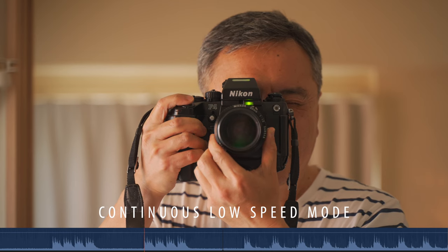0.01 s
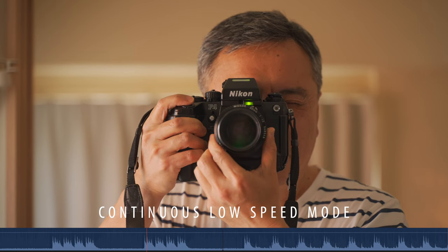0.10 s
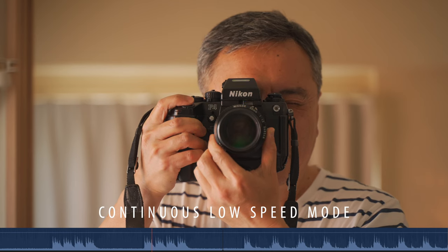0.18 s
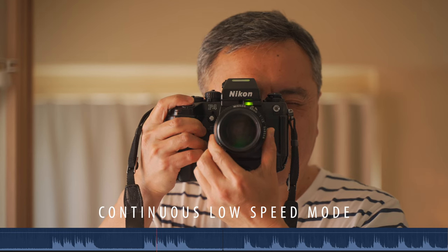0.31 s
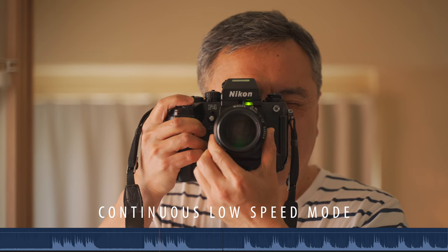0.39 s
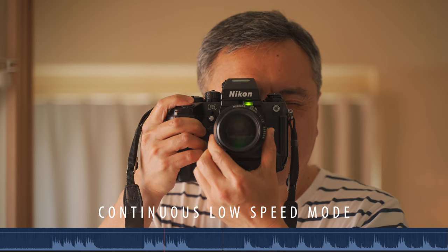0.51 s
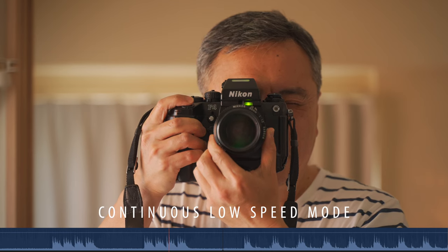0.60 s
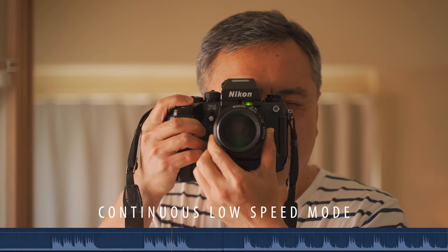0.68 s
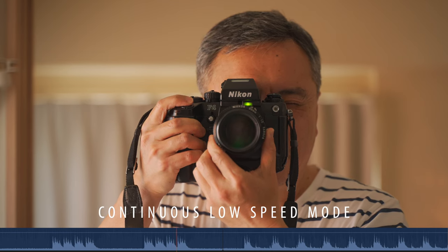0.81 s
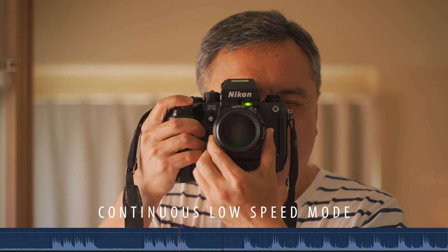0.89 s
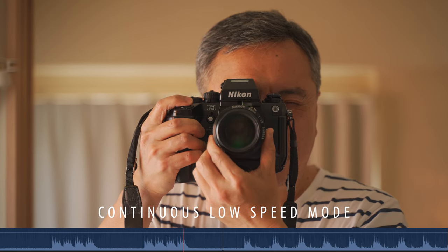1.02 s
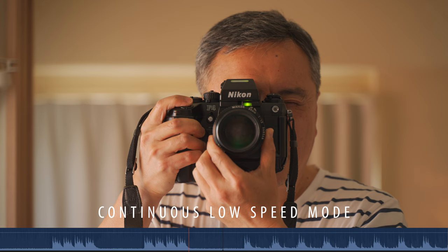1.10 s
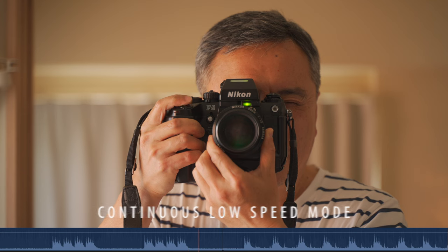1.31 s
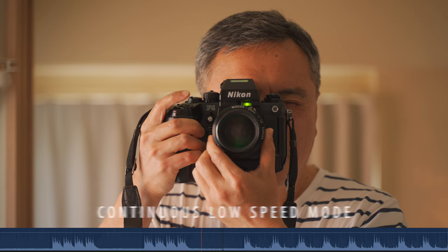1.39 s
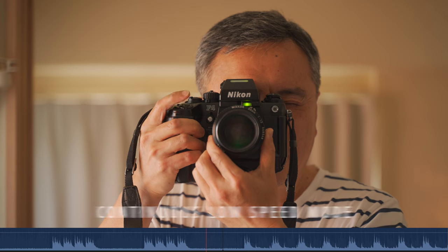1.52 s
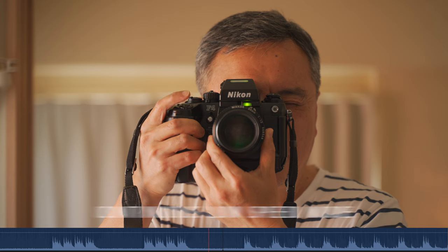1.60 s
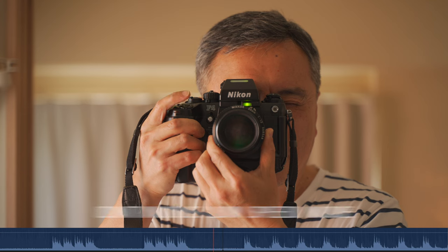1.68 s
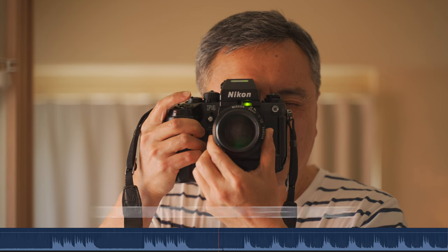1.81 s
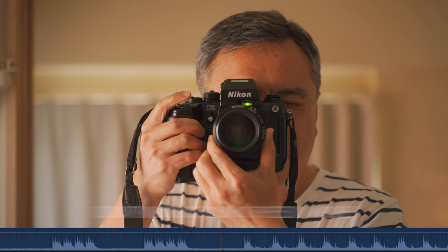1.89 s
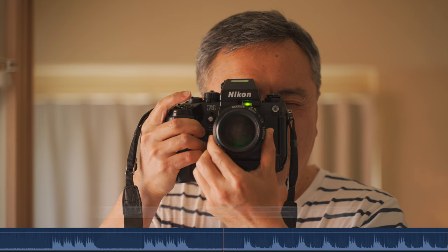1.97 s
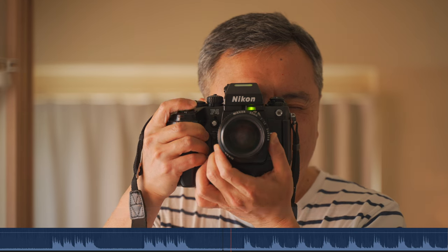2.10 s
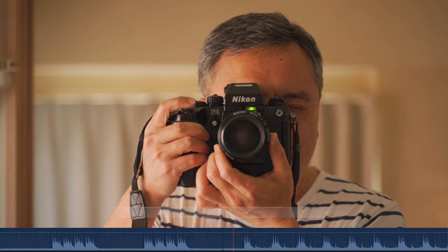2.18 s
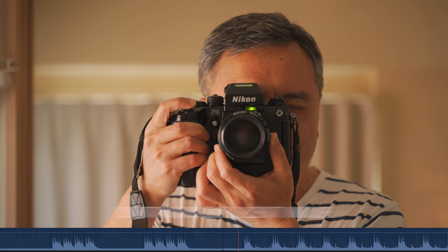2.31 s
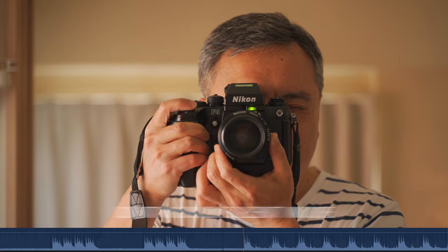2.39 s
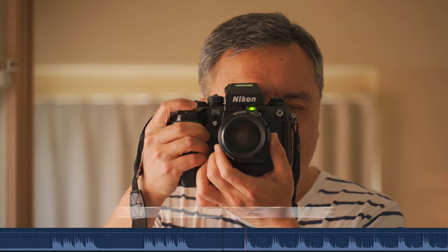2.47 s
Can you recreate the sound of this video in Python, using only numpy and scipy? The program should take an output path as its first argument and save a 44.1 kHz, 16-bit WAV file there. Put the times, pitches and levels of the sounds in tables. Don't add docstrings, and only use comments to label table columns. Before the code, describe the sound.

A film camera shoots four evenly spaced frames, heard close in a small furnished room. Low hum and soft hiss lead in; sharp mirror clacks come at about 0.24, 0.51, 0.78 and 1.05 s. Each is followed by shutter clatter, a short ticking motor whir, a latch click and the mirror dropping back. From 1.3 s quiet returns, with faint hand and strap ticks near 1.43 and 2.16-2.32 s.

```python
import sys
import numpy as np
from scipy import signal
from scipy.fft import rfft, irfft, next_fast_len
from scipy.io import wavfile
from scipy.ndimage import map_coordinates

SR = 44100
rng = np.random.default_rng(int(sys.argv[2]) if len(sys.argv) > 2 else 0)


def convert_level_to_amplitude(level_db):
    exponent = np.asarray(level_db, float) / 20
    return 10 ** exponent


def dump(signal):
    limited = np.clip(np.atleast_2d(signal).T, -1, 1)
    pcm = np.round(limited * 32767).astype(np.int16)
    wavfile.write(sys.argv[1], SR, pcm)


N = 110250

# pitch_hz, level_db_per_hz
ROOM_NOISE = [(20, -19), (44, -4.5), (107, -2.5), (154, -8), (513, -10.5), (1200, -17.5), (2000, -25),
              (5000, -38)]
# time_s, change_db
ROOM_NOISE_SWELL = [(0, 0), (1.35, 0), (1.55, 1.2), (1.8, .5), (2.25, 0), (2.5, 0)]
# pitch_hz, width_hz, level_db
HUM = [(55.3, 13, -63.5), (103.7, 12, -60), (213.7, 25, -63), (517, 130, -59), (872, 41, -70.5),
       (1184, 89, -73.5)]
# time_s, change_db
HUM_SWELL = [(0, -4), (.3, -2.5), (1.2, -3), (1.5, 1), (2.1, -2.5), (2.21, 4), (2.3, 2.5), (2.5, 3)]
# pitch_hz, level_db_per_hz
MIC_HISS = [(1000, -0.1), (6000, 0.93), (12000, -1.3), (16000, -1)]
# pitch_hz, t60_s
ROOM_DECAY = [(300, 0.28), (800, 0.32), (2100, 0.27), (5500, 0.28), (14600, 0.22)]
# pitch_hz, t60_s
LATE_DECAY = [(1000, 1.3), (3000, 0.83), (8000, 0.75), (13000, .35)]
# start_s, level_db, pitch_hz, width_hz
STRAP_TICKS = [
    (1.434, -50, 8200, 900),
    (2.158, -45, 3500, 6000),
    (2.225, -59, 6100, 4000),
    (2.322, -46, 1470, 300),
]

# start_s, peak_db
FRAMES = [
    (0.2435, -8),
    (0.512, -7.7),
    (0.7805, -7.8),
    (1.049, -7.7),
]
LATCH_LAG_MS = [.5, -.1, -.3, 0]

# after_strike_ms, level_db, rattle_fade_ms (time to fall
# 50.4 dB)
MIRROR_UP_BLOWS = [(-3.5, -20, 10), (-0.2, -3, 11), (1, -1, 19.8), (6.5, -10.5, 32), (10.5, -14, 11),
                   (13.5, -14, 42), (24.5, -14.5, 20), (26.5, -15, 22), (37, -19.5, 16)]
BLADE_BLOWS = [(52.1, -12.5, 22), (53.8, -11, 13), (56, -6, 20), (58.36, -3.5, 20.3), (60.66, -4, 21),
               (64.34, -6.5, 20), (73.5, -22, 29)]
LATCH_BLOWS = [(102.27, -6, 9.3), (106.14, -9.5, 12.5), (107.3, -10, 15), (110.3, -15.5, 36),
               (121.1, -11, 9), (125.8, -15, 11)]
MIRROR_DOWN_BLOWS = [(157, -19, 7.4), (162.6, -11.5, 20), (163.4, -10.5, 21.6), (166.5, -7, 7.8),
                     (168.7, -8, 27), (184, -19.5, 6.8), (182.5, -15, 18)]
RATCHET_TICKS = [(79, -20, 5), (83, -18, 5), (89.5, -19, 5), (94, -20, 5), (115, -19, 5), (129.5, -18, 5),
                 (135.5, -20, 5), (142.5, -20, 5), (147, -21, 5), (173, -14, 6), (176.5, -15, 6),
                 (191, -21, 6)]

# pitch_hz, width_hz, level_db
MIRROR_UP_RING = [(2780, 110, 0.5), (3510, 170, -4.5), (4540, 240, -2.5), (5320, 200, -12), (6470, 310, -4),
                  (7150, 350, -6.5), (8970, 310, -3.5), (10240, 250, -11)]
BLADE_RING = [(2010, 50, -6), (4400, 340, 0.5), (5360, 270, -2.5), (6750, 330, -2), (9000, 710, -4),
              (12930, 560, -14)]
LATCH_RING = [(1174, 310, -3), (1633, 46, 0), (2033, 120, 3.5), (3000, 170, 0.5), (4270, 250, -2.5),
              (8800, 350, -12), (10330, 280, -8.5)]
MIRROR_DOWN_RING = [(1550, 31, -18), (2360, 130, -5.5), (2800, 90, -4), (5300, 470, -15), (5940, 110, -1),
                    (6430, 110, 0), (8800, 190, -2)]
MOTOR_RING = [(1590, 170, -15), (2280, 230, 0), (2750, 340, -0.5), (3590, 170, -5), (4650, 170, -8),
              (6310, 180, -9), (8200, 250, -15.5)]
# pitch_hz, level_db_per_hz
MIRROR_UP_TONE = [(300, -28), (600, -14), (1000, -11.5), (2000, -5), (2740, -8.5), (5080, -10),
                  (9090, -6.5), (16000, -19)]
BLADE_TONE = [(200, -29), (500, -17.5), (900, -16), (2020, -4), (4350, -3.5), (8900, -6.5), (15000, -22)]
LATCH_TONE = [(180, -41), (300, -26), (1300, -13.5), (2840, -5.5), (4500, -5), (10400, -8), (16000, -14.5)]
MIRROR_DOWN_TONE = [(200, -42), (500, -17), (1000, -11.5), (2000, -3), (2800, -4.5), (5630, -4), (6880, 1),
                    (15000, -20.5)]
MOTOR_TONE = [(180, -46), (300, -15.5), (885, -7), (1160, -4.5), (2740, -5.5), (8220, -7), (16000, -24)]

# after_strike_ms, pitch_hz, level_db, fade_ms (time to
# fall 81.3 dB), rise_ms
SHELL_KNOCKS = [(162, 3000, -18, 30, 1.5), (169.5, 1600, -30, 100, 3.1), (0, 1282, -30, 69, 2.2),
                (0, 2130, -24, 11, .4), (12, 6400, -21, 36, 1.5),
                (-.2, 2780, -14.5, 22, .5), (58, 4450, -20, 28, 1.2), (56, 6900, -23, 20, .8),
              (0, 910, -29, 70, 2), (2, 775, -35, 70, 3), (4, 533, -39, 100, 6), (57, 895, -27, 60, 3),
              (57, 500, -37, 50, 3), (157, 522, -27, 90, 11), (160, 899, -26, 90, 5),
              (163, 775, -31, 90, 5), (180, 1180, -32, 50, 3)]
LATCH_KNOCKS = [(102.5, 2800, -12, 24, .4), (102.5, 3120, -19, 24, .4), (109, 2900, -18, 24, 1.2),
                (120, 2950, -18, 10, .4), (102.6, 1630, -25, 52, 1.2), (102.5, 10130, -22, 22, .3),
                (102.5, 8160, -25, 40, .4), (102.5, 13200, -27, 14, .3), (102.6, 1260, -28, 40, 1.2),
                (120, 10500, -24, 8, .3)]

SCATTER_DB = 0.5


def unit(x):
    return x / np.sqrt(np.mean(x ** 2) + 1e-20)


def along(points, hz):
    pitch, value = np.transpose(points)
    return np.interp(np.log(hz + 1), np.log(pitch + 1), value)


def over_time(points):
    return np.interp(np.arange(N) / SR, *np.transpose(points))


def bump(f, hz, width):
    return 1 / (1 + (2 * (f - hz) / width) ** 2)


def filtered(x, response):
    size = next_fast_len(x.shape[-1] + SR // 4)
    spectrum = rfft(x, size) * response(np.fft.rfftfreq(size, 1 / SR))
    return irfft(spectrum, size)[..., :x.shape[-1]]


def coloured_noise(response):
    return unit(filtered(rng.standard_normal(N), response))


def wobble(rate):
    knots = rng.standard_normal(N // 100)[:int(N * rate / SR) + 4]
    return map_coordinates(knots, [np.arange(N) * rate / SR])


def background():
    noise_db = -52.5 + 0.5 * wobble(5.7) + over_time(ROOM_NOISE_SWELL)
    sound = convert_level_to_amplitude(noise_db) * coloured_noise(lambda f: convert_level_to_amplitude(along(ROOM_NOISE, f)))
    swell_db = over_time(HUM_SWELL)
    for hz, width, db in HUM:
        hum_db = db + swell_db + 1.2 * wobble(7.53)
        sound += convert_level_to_amplitude(hum_db) * coloured_noise(lambda f: bump(f, hz, width))
    thud_s, thud_length_s, thud_hz, thud_db = 1.05, 0.089, 38, -54
    thud_shape = np.exp(-((np.arange(N) / SR - thud_s) / thud_length_s) ** 2)
    return sound + convert_level_to_amplitude(thud_db) * thud_shape * coloured_noise(lambda f: bump(f, thud_hz, 15))


def room(x):
    delay_ms, late_db = 3.5, -24
    hz, t, grains = signal.stft(rng.standard_normal(SR // 2), SR, nperseg=256)
    main = convert_level_to_amplitude(-60 * t / along(ROOM_DECAY, hz)[:, None])
    late = convert_level_to_amplitude(late_db - 60 * t / along(LATE_DECAY, hz)[:, None])
    tail = signal.istft(grains * (main + late), SR, nperseg=256)[1]
    delayed = np.pad(x, (round(delay_ms * SR / 1000), 0))
    return signal.fftconvolve(delayed, tail / np.linalg.norm(tail))[:N]


def strap():
    out, t = np.zeros(N), np.arange(SR // 10) / SR
    t60_ms = 87
    for s, db, hz, width in STRAP_TICKS:
        puff = convert_level_to_amplitude(-60e3 * t / t60_ms) * rng.standard_normal(len(t))
        tick = unit(filtered(puff, lambda f: bump(f, hz, width)))
        out[round(s * SR):][:len(t)] += convert_level_to_amplitude(db - 25) * tick
    return out


def body(tone, ring):
    size, sharpest_q = 2 ** 13, 28
    f = np.fft.rfftfreq(size, 1 / SR)
    power = convert_level_to_amplitude(2 * (along(tone, f) + 1))
    for hz, width, db in ring:
        power += convert_level_to_amplitude(2 * db) * bump(f, hz, max(width, hz / sharpest_q))
    ceps = irfft(np.log(power + 1e-10) / 2)
    ceps[1:size // 2] *= 2
    ceps[size // 2 + 1:] = 0
    h = irfft(np.exp(rfft(ceps)))[:size // 2]
    return h / np.linalg.norm(h)


def winder():
    on_ms, off_ms, rise_ms, fall_ms = 51, 169.5, 14, 27
    motor_db, teeth_hz, teeth_depth, grit_db = -33, 416, 0.55, 3.5
    whine_hz, whine_db = 893, -50
    runs = np.zeros(N)
    for s, _ in FRAMES:
        ms = np.arange(N) / SR * 1000 - s * 1000
        runs += np.clip((ms - on_ms) / rise_ms, 0, 1) * np.exp(-np.maximum(ms - off_ms, 0) / fall_ms)
    teeth_turns = np.cumsum(teeth_hz * (1 + 0.15 * wobble(60))) / SR
    teeth = 1 + teeth_depth * np.sin(2 * np.pi * teeth_turns)
    roughness = convert_level_to_amplitude(1.4 * wobble(150) + grit_db * wobble(420))
    whirr = unit(teeth * roughness * rng.standard_normal(N))
    whine_turns = np.cumsum(whine_hz * (1 + 0.0052 * wobble(54.0))) / SR
    whine = convert_level_to_amplitude(whine_db + 1.2 * wobble(40)) * np.sin(2 * np.pi * whine_turns)
    gears = signal.fftconvolve(convert_level_to_amplitude(motor_db) * runs * whirr, body(MOTOR_TONE, MOTOR_RING))[:N]
    return gears + runs * whine


def knocks(modes, lag_ms=(0, 0, 0, 0)):
    out, t = np.zeros(N), np.arange(SR // 8) / SR
    for ms, hz, db, t60_ms, rise_ms in modes:
        for (s, _), lag in zip(FRAMES, lag_ms):
            loud, tune = rng.standard_normal(2)
            fade = convert_level_to_amplitude(db + SCATTER_DB * loud - 81300.0 * t / t60_ms)
            rise = 1 - np.exp(-1000 * t / rise_ms)
            note = np.sin(2 * np.pi * hz * (1 + 0.0059 * tune) * t)
            out[round((s + (ms + lag) / 1000) * SR):][:len(t)] += fade * rise * note
    return out


def part(contacts, tone, ring, lag_ms=(0, 0, 0, 0)):
    cycle_db, fresh, jitter_ms = -14, 0.15, 0.02
    push, t = np.zeros(N), np.arange(SR // 20) / SR
    for ms, db, t60_ms in contacts:
        habit = rng.standard_normal(len(t))
        for (s, frame_db), lag in zip(FRAMES, lag_ms):
            late, loud = rng.standard_normal(2)
            rattle = np.sqrt(1 - fresh) * habit + np.sqrt(fresh) * rng.standard_normal(len(t))
            blow_db = cycle_db + db + frame_db - FRAMES[0][1] + SCATTER_DB * loud
            start = round((s + (ms + lag + jitter_ms * late) / 1000) * SR)
            push[start:][:len(t)] += convert_level_to_amplitude(blow_db - 50400.0 * t / t60_ms) * rattle
    return signal.fftconvolve(push, body(tone, ring))[:N]


def scene():
    quiet = background() + strap()
    shell = knocks(SHELL_KNOCKS) + knocks(LATCH_KNOCKS, LATCH_LAG_MS)
    camera = shell + convert_level_to_amplitude(-9) * room(shell)
    parts = [
        part(MIRROR_UP_BLOWS, MIRROR_UP_TONE, MIRROR_UP_RING),
        part(BLADE_BLOWS, BLADE_TONE, BLADE_RING),
        winder(),
        part(LATCH_BLOWS, LATCH_TONE, LATCH_RING, LATCH_LAG_MS),
        part(RATCHET_TICKS, MOTOR_TONE, MOTOR_RING),
        part(MIRROR_DOWN_BLOWS, MIRROR_DOWN_TONE, MIRROR_DOWN_RING),
    ]
    for sound in parts:
        camera += sound + convert_level_to_amplitude(-4) * room(sound)
    return (quiet + camera)[None]


def roll_off(x):
    return signal.sosfilt(signal.butter(12, 16630, fs=SR, output="sos"), x)


def record(dry):
    hiss_db, top_hz, edge_hz, leak_db = -68, 15720, 35, -46
    hiss = convert_level_to_amplitude(hiss_db) * coloured_noise(lambda f: convert_level_to_amplitude(along(MIC_HISS, f)))

    def treble_cut(f):
        slope = 1 / (1 + np.exp(np.clip((f - top_hz) / edge_hz, -30, 30)))
        return np.maximum(convert_level_to_amplitude(leak_db), slope)

    return roll_off(filtered(dry + hiss, treble_cut))


dry = scene()
out = record(dry)
dump(out)
```